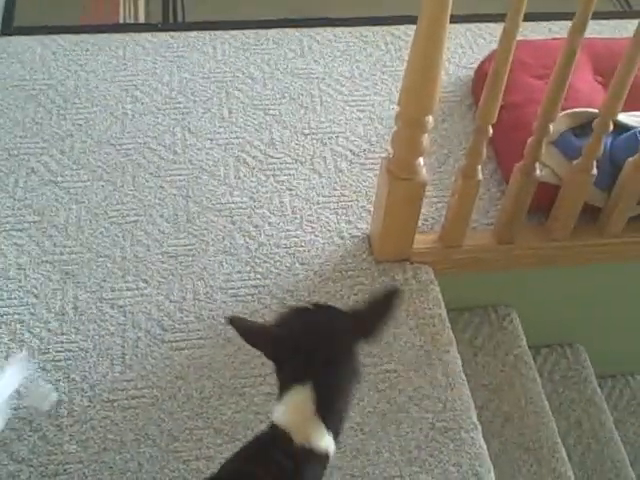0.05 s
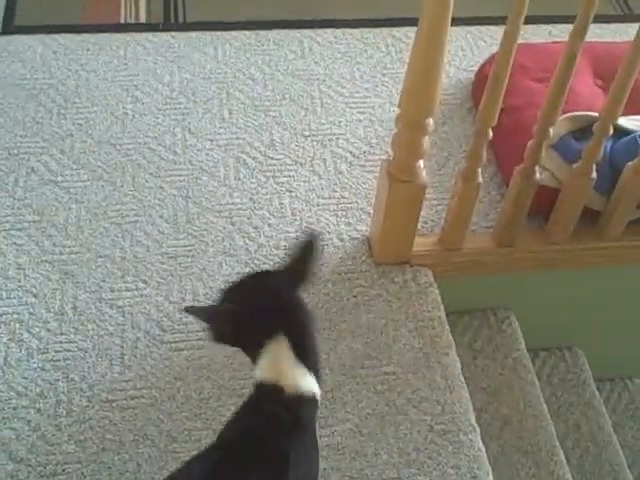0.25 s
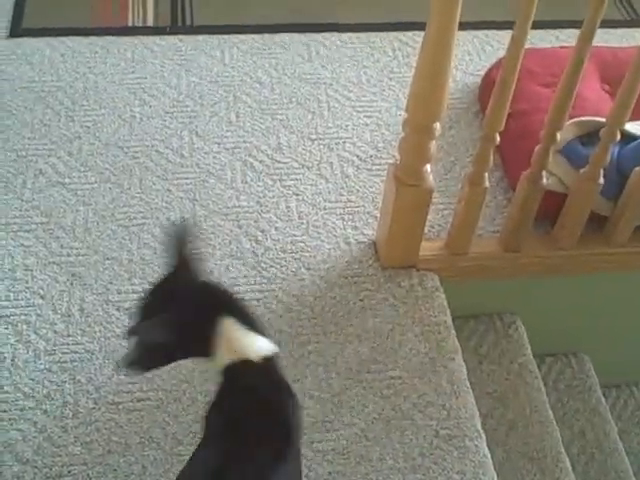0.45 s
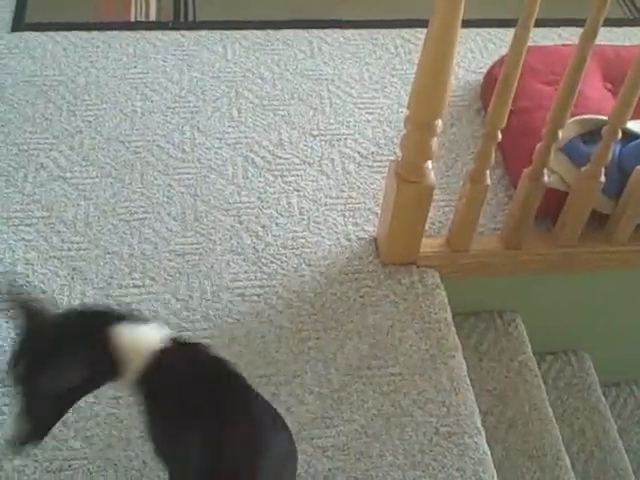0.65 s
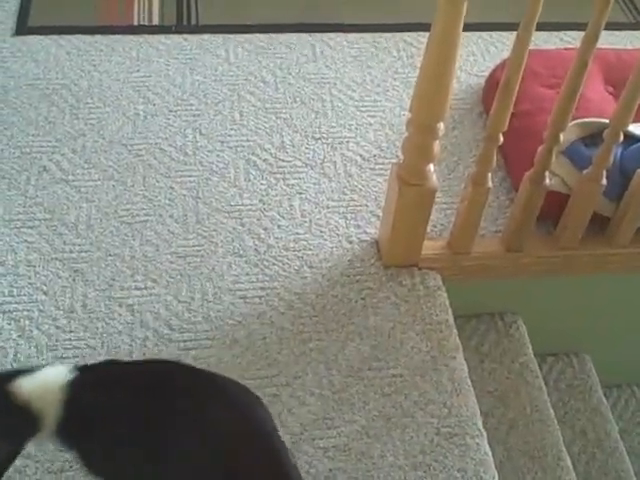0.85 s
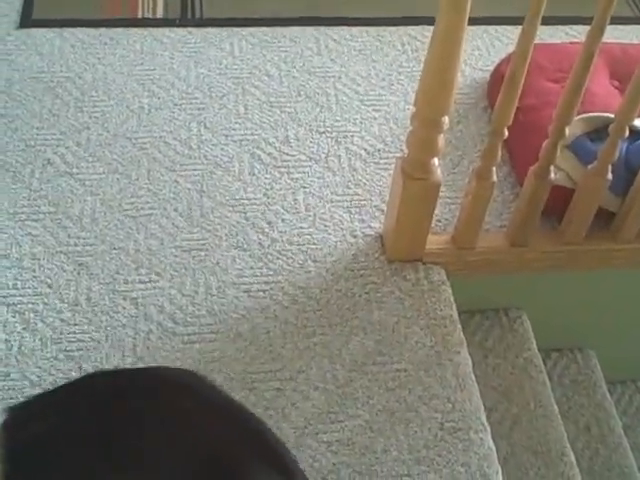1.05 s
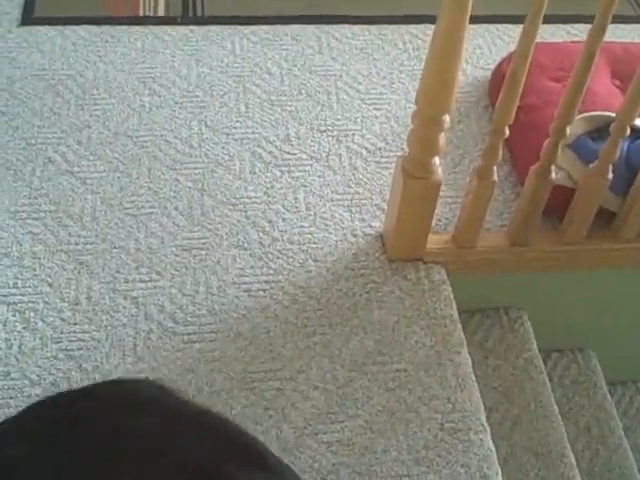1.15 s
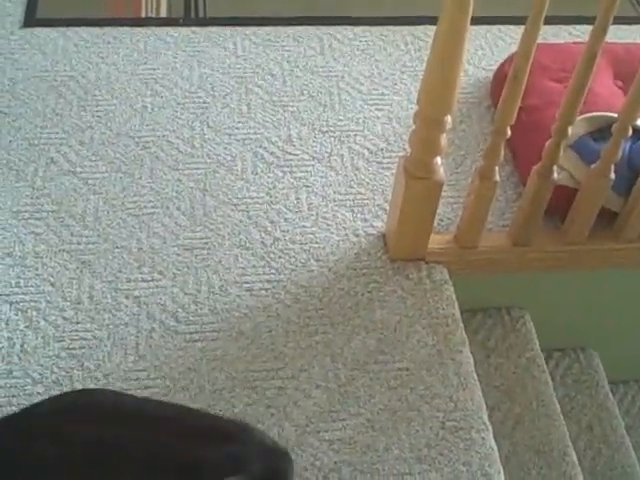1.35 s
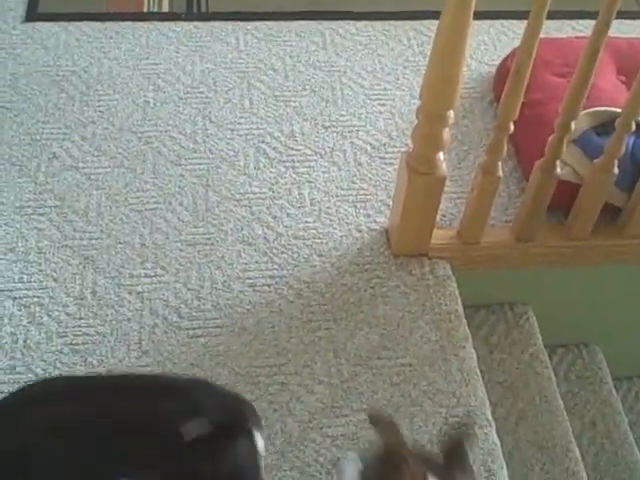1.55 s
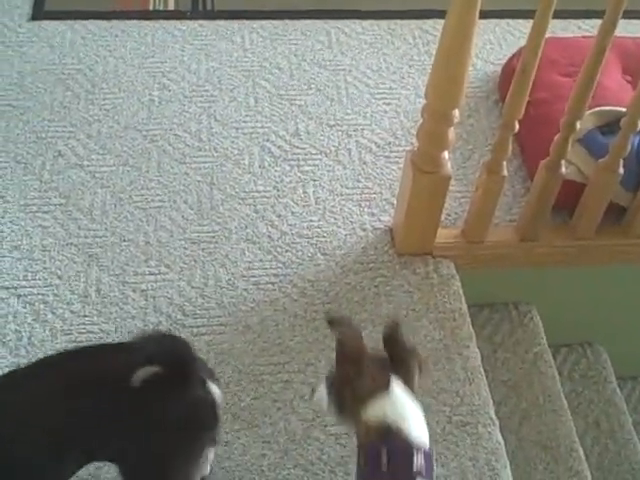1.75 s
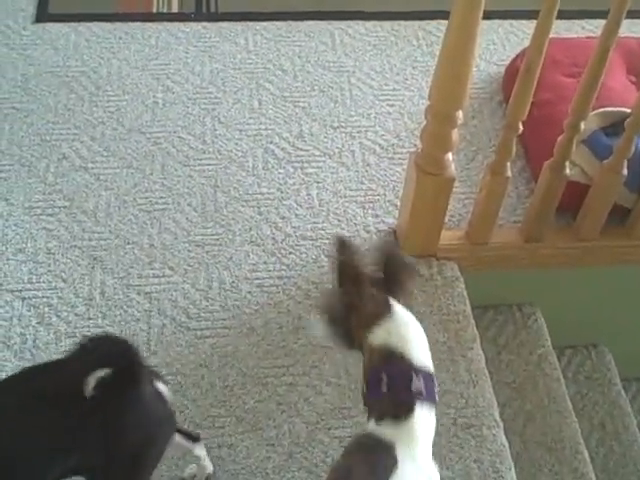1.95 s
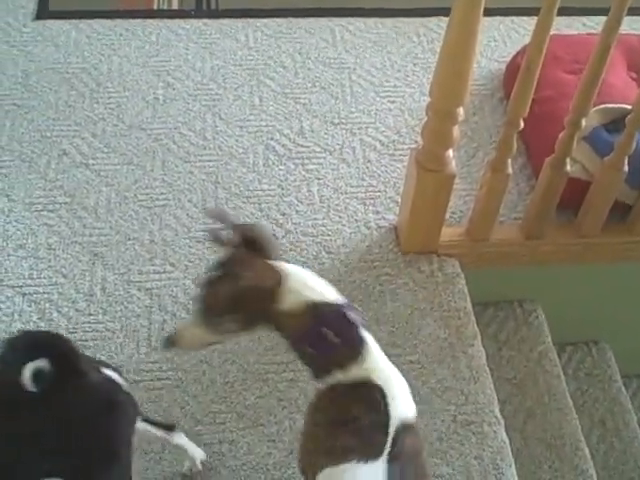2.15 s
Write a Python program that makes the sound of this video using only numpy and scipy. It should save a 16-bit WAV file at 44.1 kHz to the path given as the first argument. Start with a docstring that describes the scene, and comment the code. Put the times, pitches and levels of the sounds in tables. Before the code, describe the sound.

Metal collar tags give three short, very high jingles as small dogs move on a carpet indoors. One dog trots off with soft paw thumps, scuffs and dry clicks, then the movement fades into faint room rumble.

```python
"""Metal collar tags touch in short, very high jingles as two small dogs move about a carpeted landing.
One dog trots off: its paws thump the floor and scuff the carpet, with a run of dry clicks and snaps
and two tiny creaks. Coats and paws rustle on the carpet over a faint room rumble."""
import sys
import numpy as np
from scipy import signal
from scipy.fft import rfft, irfft
from scipy.io import wavfile

SR = 44100
rng = np.random.default_rng(int(sys.argv[2]) if len(sys.argv) > 2 else 0)


def waveform_to_disk(signal):
    """Save audio, clipped to [-1, 1], as 16-bit WAV at the path in sys.argv[1]."""
    frames = np.transpose(np.atleast_2d(signal))
    scaled = np.clip(frames, -1, 1) * 32767
    samples = np.round(scaled).astype(np.int16)
    wavfile.write(sys.argv[1], SR, samples)


N = 97020
TIME = np.arange(N) / SR


def from_db(db):
    """Decibels to gain."""
    return 10 ** (np.asarray(db) / 20)


def fade(t60_s, size=N):
    """Exponential decay, down 60 dB after t60_s."""
    return np.exp(-np.log(1000) * TIME[:size] / t60_s)


def unit(x):
    """Scale to energy 1."""
    return x / np.sqrt(np.sum(x ** 2) + 1e-30)


def burst(x, db, window_s=.005):
    """Scale to the energy of a burst of window_s at this rms level."""
    return from_db(db) * np.sqrt(window_s * SR) * unit(x)


def at_hz(points, hz):
    """Read a table on a log-frequency axis."""
    points_hz, values = np.transpose(points)
    return np.interp(np.log(np.maximum(hz, 1)), np.log(points_hz), values)


def level(rows):
    """Level curve to gain per sample."""
    return from_db(np.interp(TIME, *np.transpose(rows)))


def noise(spectrum, size=N):
    """Coloured noise of rms 1."""
    gain = from_db(at_hz(spectrum, np.fft.rfftfreq(size, 1 / SR)))
    return unit(irfft(rfft(rng.standard_normal(size)) * gain, size)) * np.sqrt(size)


def band(x, low_hz, high_hz, order=2):
    """Causal band-pass."""
    sos = signal.butter(order, [low_hz, high_hz], "band", fs=SR, output="sos")
    return signal.sosfilt(sos, x + 1e-18)


def add(out, start_s, x):
    """Mix x in at start_s."""
    i = int(start_s * SR)
    out[i:i + len(x)] += x[:N - i]


def causal(gain):
    """Spectrum of the minimum-phase filter with these gains."""
    cepstrum = irfft(np.log(gain))
    cepstrum[1:] *= 2
    cepstrum[len(cepstrum) // 2:] = 0
    return np.exp(rfft(cepstrum))


def chatter(t60_s, size, build_s, uneven_db, flatness=.6):
    """Dying run of tiny uneven contacts, spectrum evened out to have no pitch; energy 1."""
    grains = rng.standard_normal(size) * from_db(uneven_db * np.clip(rng.standard_normal(size), -2, 2))
    spectrum = rfft(grains * fade(t60_s, size) * (1 - np.exp(-TIME[:size] / build_s)))
    return unit(irfft(spectrum * causal((np.abs(spectrum) + 1e-9) ** -flatness)))


def room_tone(air_db=-63.5, hum_hz=120.3, hum_db=-77):
    """Deep rumble that swells and sinks, steady room air and a faint hum."""
    # Each row: time in seconds, rms level in dB.
    rumble_level = [(0, -51.5), (.13, -60), (.2, -64.5), (.55, -68.5), (.8, -72), (1, -51), (1.15, -58),
                    (1.7, -80), (2.2, -72)]
    # Each row: frequency in Hz, relative level in dB.
    rumble_spectrum = [(20, 10), (32, 8), (50, 1), (90, -12), (300, -54)]
    # Each row: frequency in Hz, relative level in dB.
    air_spectrum = [(25, -7), (45, -6), (75, 3), (160, 0), (230, -7.5), (350, -5.5), (660, -11.5),
                    (900, -20), (1400, -19), (4000, -34), (15500, -29.5)]
    rumble = level(rumble_level) * noise(rumble_spectrum)
    air = from_db(air_db) * noise(air_spectrum)
    return rumble + air + from_db(hum_db) * np.sin(2 * np.pi * hum_hz * TIME)


def room_tail(build_s=0.0012):
    """Diffuse reflections that build up quickly and die sooner in the treble."""
    # Each row: frequency in Hz, T60 in seconds.
    decay_times = [(100, 0.33), (500, 0.49), (2500, 0.42), (6000, 0.29), (14000, 0.27)]
    # Each row: frequency in Hz, relative level in dB.
    colour = [(100, 7.5), (700, -2), (2500, -4), (6000, -8), (14000, -4.5)]
    tail, edges_hz = np.zeros(N), np.geomspace(40, 19000, 10)
    for low_hz, high_hz in zip(edges_hz, edges_hz[1:]):
        mid_hz = np.sqrt(low_hz * high_hz)
        envelope = fade(at_hz(decay_times, mid_hz)) * from_db(at_hz(colour, mid_hz))
        tail += band(rng.standard_normal(N), low_hz, high_hz) * envelope
    return unit(tail * (1 - np.exp(-TIME / build_s)))


def rustle():
    """Coats and paws brush the carpet."""
    # Each row: time in seconds, rms level in dB.
    rustle_level = [(0, -62), (.12, -56.5), (.22, -56.5), (.31, -60), (.41, -61.5), (.55, -57),
                    (.68, -46.5), (.79, -52), (.86, -54), (.95, -48.5), (1.06, -52), (1.19, -60.5),
                    (1.35, -58.5), (1.5, -62.5), (1.8, -67), (2.2, -67.5)]
    # Each row: frequency in Hz, relative level in dB.
    spectrum = [(150, 12), (400, 2), (1000, -2.5), (2600, -4), (5000, -8.5), (9000, -13.5), (15000, -18)]
    return level(rustle_level) * noise(spectrum)


def creaks(overtone_db=-16):
    """Short, nearly pure creaks that swell and stop."""
    # Each row: start in seconds, pitch in Hz, level in dB, length in seconds.
    creak_events = [(0.841, 710, -40, 0.0054), (0.913, 611, -37, 0.016)]
    out = np.zeros(N)
    for start_s, hz, db, length_s in creak_events:
        t = TIME[TIME < length_s]
        phase = 2 * np.pi * hz * t
        tone = np.sin(phase) + from_db(overtone_db) * np.sin(2 * phase)
        add(out, start_s, from_db(db) * np.sin(np.pi * t / length_s) * tone)
    return out


def clicks(size=4096):
    """Sharp contacts with fine chatter, coloured by one short ring, a hard edge and a bright top."""
    # Each row: start in seconds, level in dB, ring boost in dB, ring frequency in Hz, edge in dB,
    # top in dB, chatter share of the energy (0-1), chatter T60 in seconds.
    contacts = [(0.4952, -42.5, 8, 2700, -6.5, -31, 0.93, 0.045),
                (0.5732, -38.5, 9.5, 3300, -8, -30, 0.98, 0.067),
                (.6025, -42.5, 4, 2970, -1, -5, 0.8, 0.042),
                (.6429, -26.5, 19.5, 2950, -7, -14, 0.77, 0.0086),
                (0.6473, -31, 17, 2830, -11, -13, .3, 0.012),
                (0.6514, -37, 14.5, 2350, -11, -16, 0.76, 0.022),
                (0.7211, -38, 2, 2690, -2, -19, 0.6, 0.043),
                (0.7996, -39.5, 1, 2400, -9.5, -17, 0.76, 0.033),
                (0.8806, -32, 8, 2550, -10.5, -18, 0.72, 0.033),
                (0.9236, -30.5, 7.5, 2600, -1, -26, 0.48, 0.023),
                (0.9584, -36, 7.5, 2200, -8, -9.5, 0.83, 0.028), (1.0064, -25, 9, 2570, 1, 3, 0.4, 0.043),
                (1.0394, -34, 8.5, 3100, -14.5, -19, 0.86, 0.032),
                (1.081, -37.5, 9.5, 2730, -5.5, -35, 0.2, 0.04),
                (1.226, -51, 5, 2800, -13, -11, 0.92, 0.14), (1.277, -55, -1, 2900, -7, -12, 0.8, 0.052),
                (1.34, -51, 1, 2910, -8, -15, 0.93, 0.14), (1.7363, -59, -7, 2720, -7.5, -18, 0.4, 0.019),
                (2.098, -63, -4, 2760, 8, 3, 0.6, 0.018), (2.1225, -65.5, -1, 2800, 2, 0, .5, 0.024),
                (2.156, -62, 7, 3000, -3, -14, 0.64, 0.084)]
    out, hz = np.zeros(N), np.fft.rfftfreq(size, 1 / SR)
    for start_s, db, ring_db, ring_hz, edge_db, top_db, share, t60_s in contacts:
        force = np.sqrt(share) * chatter(t60_s, size, build_s=0.0025, uneven_db=3)
        force[0] -= np.sqrt(1 - share)  # first contact
        colour = [(60, -11), (400, -3.5), (1400, -0.5), (6000, edge_db),
                  (10000, (edge_db + top_db) / 2 - 1), (14500, top_db)]
        width_hz = 2020 * 2 ** (-ring_db / 16)  # a stronger ring is narrower
        boost_db = ring_db / (1 + np.abs(2 * (hz - ring_hz) / width_hz) ** 3)
        response = causal(from_db(at_hz(colour, hz) + boost_db))
        add(out, start_s, burst(irfft(rfft(force) * response), db))
    return out


def paws(size=16384, floor_build_s=0.0037, damp_s=0.088, scuff_t60_s=.17):
    """A soft push sets the floor booming, the next paw damps it a little; the pad scuffs the carpet."""
    # Each row: start in seconds, thump peak in dB, push length in seconds, scuff level in dB.
    steps = [(0.161, -51.5, 0.0058, -62), (0.357, -62, 0.0032, -54.5), (0.425, -56, 0.0085, -59),
             (0.493, -57, 0.0024, -50), (0.534, -46, 0.0021, -52), (0.636, -39, 0.0099, -42),
             (.664, -48, 0.0035, -41), (.745, -42.5, 0.0135, -50), (.787, -40, 0.013, -38.5),
             (0.9428, -23, 0.0088, -37.5), (.9745, -36, 0.0077, -52.5), (1.0111, -29, 0.0061, -39),
             (1.043, -42, 0.0039, -40), (1.077, -62, 0.0063, -53), (1.217, -50, 0.011, -61),
             (1.264, -52, 0.011, -50), (1.334, -53, 0.0082, -49), (1.458, -61, 0.015, -56),
             (1.622, -54, 0.015, -54), (1.932, -58, 0.0077, -60), (2.139, -55.5, 0.013, -64)]
    # Each row: frequency in Hz, relative level in dB, T60 in seconds.
    floor_modes = [(75.3, -9, 0.35), (119.4, -7, 0.18), (144, 1.5, 0.11), (181.8, -15, 0.65),
                   (283, -11, 0.27)]
    # Each row: frequency in Hz, relative level in dB.
    scuff_spectrum = [(30, -39), (80, -13), (180, -3), (300, -1.5), (420, -8), (700, -11.5), (1200, -29),
                      (3000, -24), (12000, -53)]
    out, t = np.zeros(N), TIME[:size]
    floor = sum(from_db(db) * fade(t60_s, size) * np.sin(2 * np.pi * hz * t)
                for hz, db, t60_s in floor_modes)
    floor = band(floor * (1 - np.exp(-t / floor_build_s)), low_hz=48.3, high_hz=860, order=1)
    next_starts_s = [row[0] for row in steps[1:]] + [N / SR]
    for (start_s, thump_db, push_s, scuff_db), next_s in zip(steps, next_starts_s):
        push = np.sin(np.pi * np.minimum(t / push_s, 1)) ** 2
        damping = np.exp(-np.maximum(start_s + t - next_s, 0) / damp_s)
        thump = signal.fftconvolve(push, floor)[:size] * damping
        add(out, start_s, -from_db(thump_db) * thump / np.abs(thump).max())
        scuff = noise(scuff_spectrum, size) * fade(scuff_t60_s, size) * (1 - np.exp(-t / push_s))
        add(out, start_s, from_db(scuff_db) * scuff)
    return out


def tag_ring(tilt_db_per_khz, size, centre_hz=10600, detune_hz=29, free_db=-14.5, free_t60_s=.3):
    """Close, slightly detuned metal modes beat; each drops fast, then rings on faintly."""
    # Each row: frequency in Hz, relative level in dB, T60 of the fast drop in seconds.
    modes = [(10020, -12, .03), (10200, 0, .045), (10440, -6, .035), (10670, -3, .04), (10790, 0, .04),
             (11000, -5, .035), (11280, -13, .025), (13850, -21, .03), (15080, -20, .03)]
    ring = np.zeros(size)
    for hz, db, t60_s in modes:
        offset_khz = np.clip(hz - centre_hz, -500, 500) / 1000
        envelope = fade(t60_s, size) + from_db(free_db) * fade(free_t60_s, size)
        cycles = (hz + detune_hz * rng.normal()) * TIME[:size] + rng.random()
        ring += from_db(db + tilt_db_per_khz * offset_khz) * envelope * np.sin(2 * np.pi * cycles)
    return ring


def tags(size=16384, stop_s=0.0037, clash_t60_s=0.063, tick_db=-4.5):
    """Each touch is a tick and a brief clash; it stops the earlier ring and starts a new one."""
    # Each row: start in seconds, ring level in dB, clash level in dB, tilt of the modes in dB per kHz.
    touches = [(0.2337, -39, -53, 7), (0.2358, -40, -45, -3), (0.2429, -35.5, -43, 3),
               (0.253, -37, -45.5, 17), (.258, -46, -52, 5), (0.4218, -34, -43.5, 11),
               (0.4239, -40, -39, -2), (0.4292, -44, -34, -3), (0.431, -33, -39.5, -2),
               (0.4352, -35.5, -52, 1), (0.4382, -37, -53, 2), (0.602, -35, -37, -14),
               (0.606, -41, -57, -13), (1.389, -59, -63, 1), (1.412, -64, -70, 7), (1.4545, -52.5, -60, 0),
               (1.463, -55, -57, 3), (1.479, -47.5, -56, 4)]
    # Each row: frequency in Hz, relative level in dB.
    clash_spectrum = [(300, -7.5), (1000, -2), (3500, 0.5), (8000, -1.5), (11000, 0), (15000, 7)]
    out, t = np.zeros(N), TIME[:size]
    metal = causal(from_db(at_hz(clash_spectrum, np.fft.rfftfreq(size, 1 / SR))))
    next_starts_s = [row[0] for row in touches[1:]] + [N / SR]
    for (start_s, ring_db, clash_db, tilt_db_per_khz), next_s in zip(touches, next_starts_s):
        ring = burst(tag_ring(tilt_db_per_khz, size), ring_db)
        damping = np.exp(-np.maximum(start_s + t - next_s, 0) / stop_s)
        force = chatter(clash_t60_s, size, build_s=0.00025, uneven_db=6.5)
        force[0] = from_db(tick_db)
        clash = burst(irfft(rfft(force) * metal), clash_db)
        add(out, start_s, ring * damping + clash)
    return out


def scene():
    """Tags, clicks, paws and creaks with their reflections, over rustle and room tone; mono."""
    sources = [(tags(), -12), (clicks(), -9), (paws(), -22), (creaks(), -7)]
    direct = sum(x for x, _ in sources)
    room_send = sum(x * from_db(send_db) for x, send_db in sources)
    reflections = signal.fftconvolve(room_send, room_tail())[:N]
    return (direct + reflections + rustle() + room_tone())[None]


def record(dry, cutoff_hz=15750):
    """Steep low-pass."""
    return signal.sosfilt(signal.ellip(10, .2, 70, cutoff_hz, fs=SR, output="sos"), dry)


dry = scene()
out = record(dry)
waveform_to_disk(out)
```